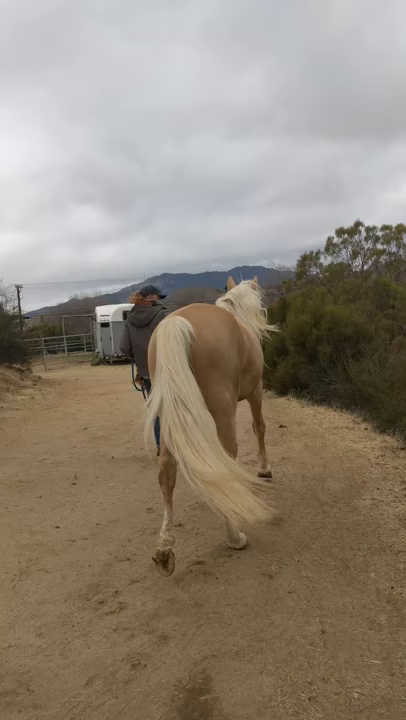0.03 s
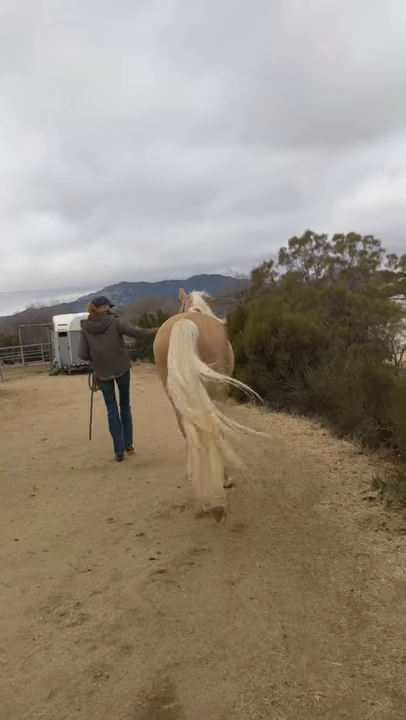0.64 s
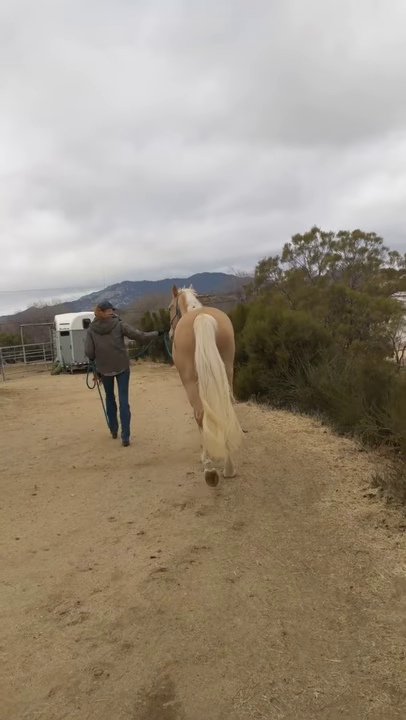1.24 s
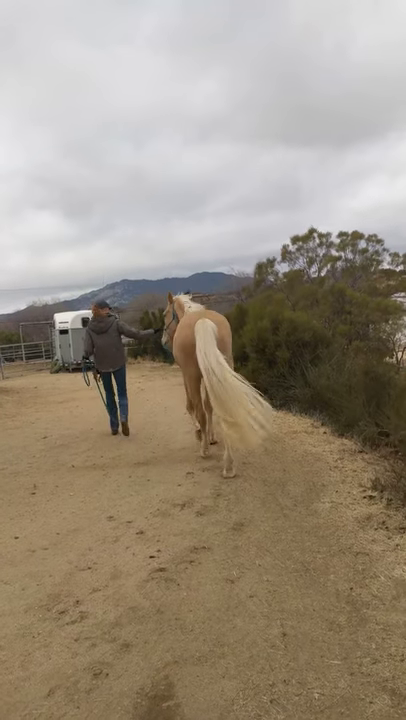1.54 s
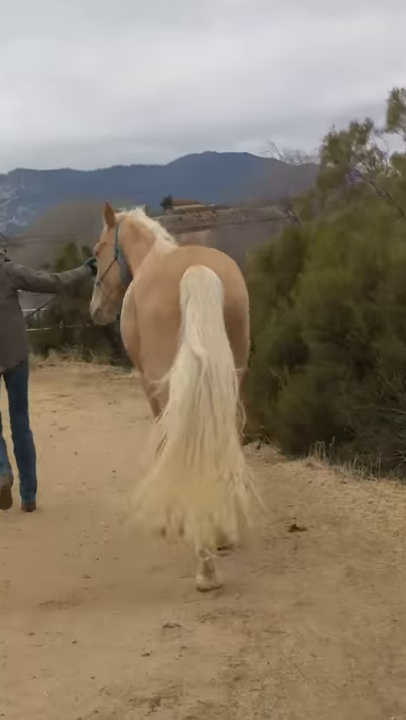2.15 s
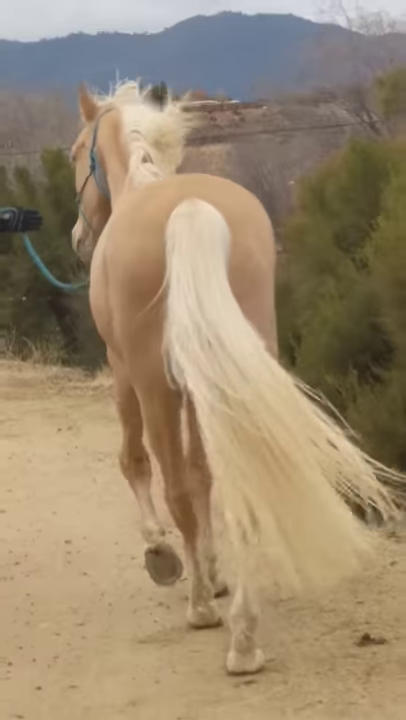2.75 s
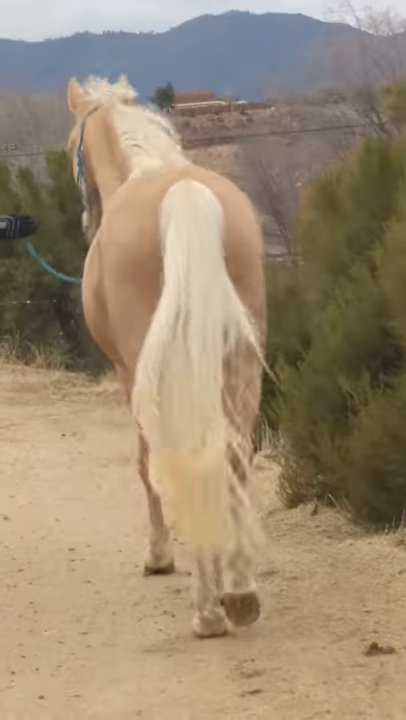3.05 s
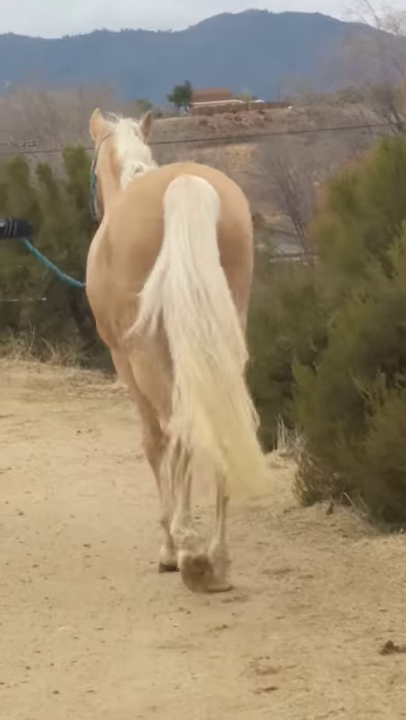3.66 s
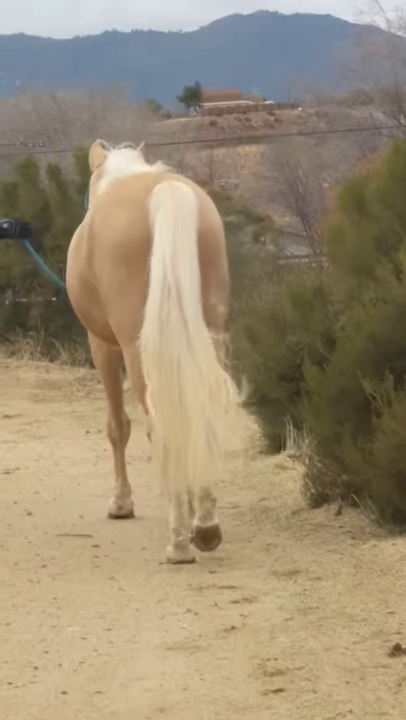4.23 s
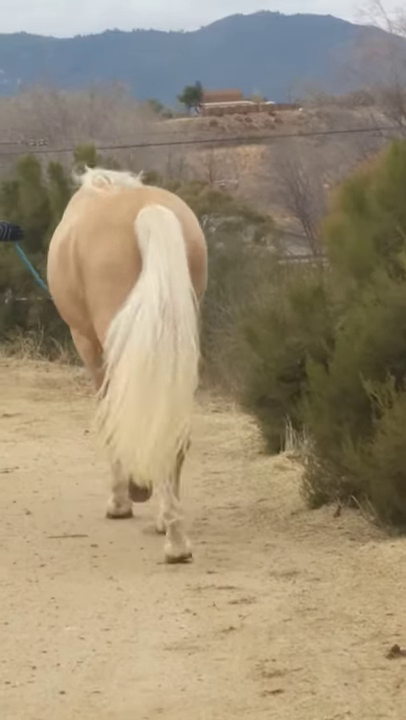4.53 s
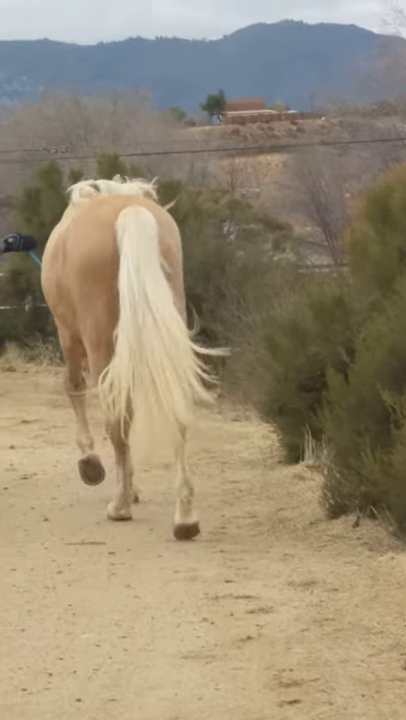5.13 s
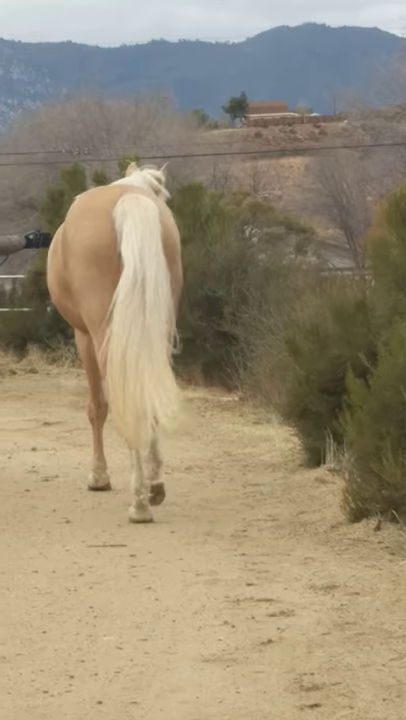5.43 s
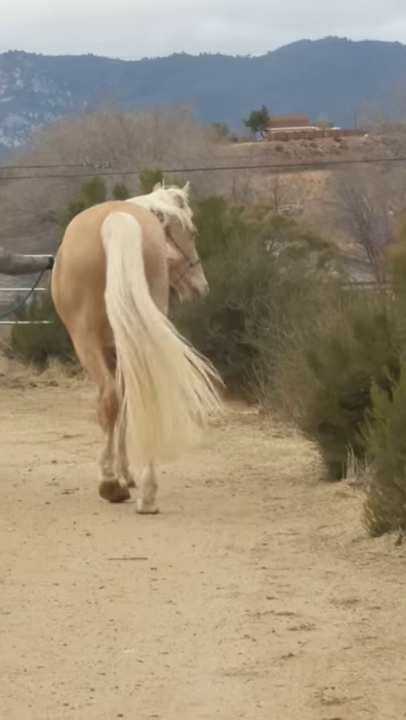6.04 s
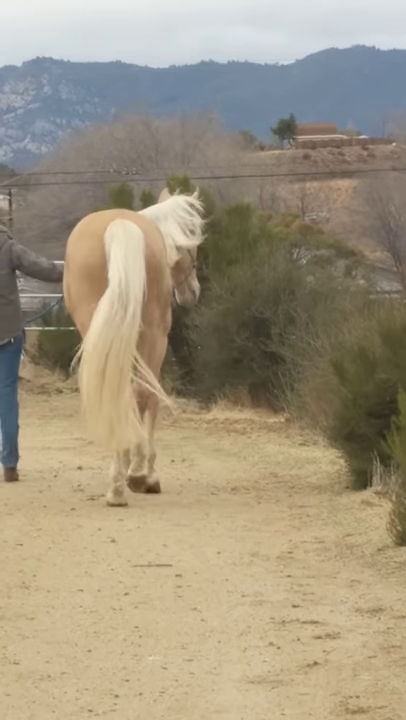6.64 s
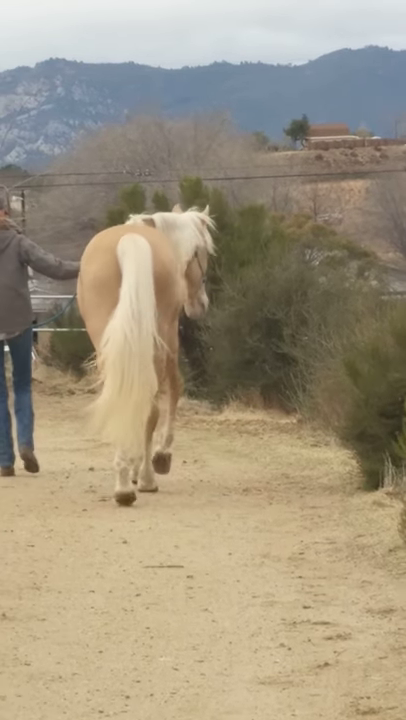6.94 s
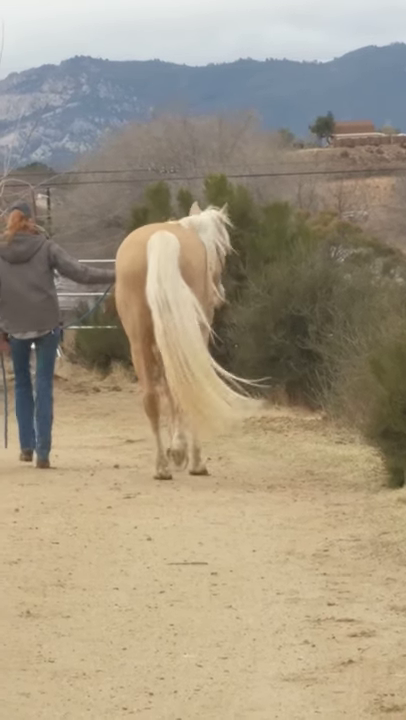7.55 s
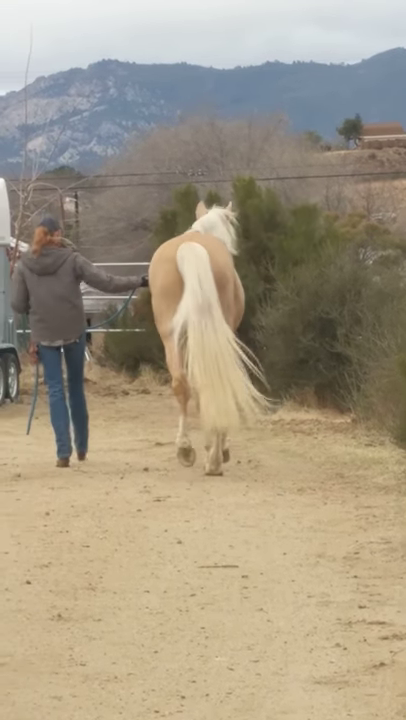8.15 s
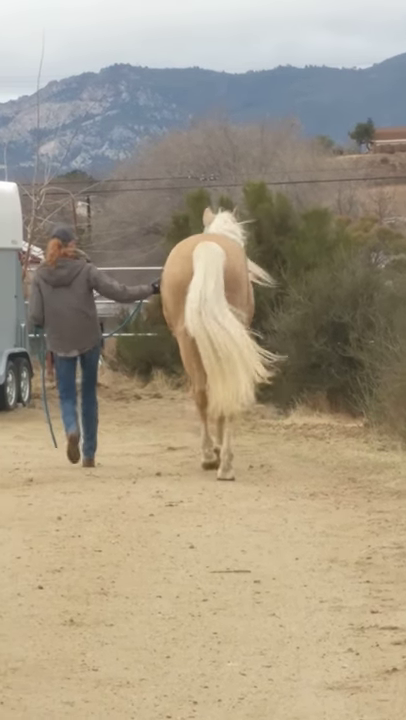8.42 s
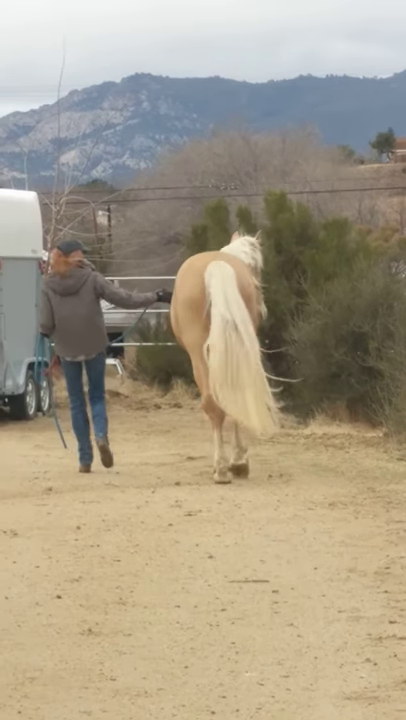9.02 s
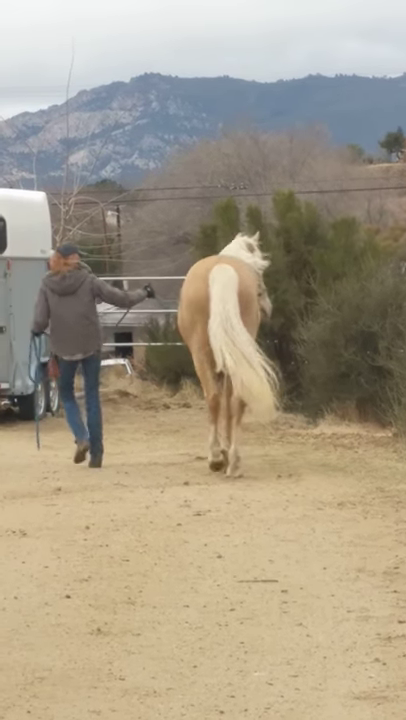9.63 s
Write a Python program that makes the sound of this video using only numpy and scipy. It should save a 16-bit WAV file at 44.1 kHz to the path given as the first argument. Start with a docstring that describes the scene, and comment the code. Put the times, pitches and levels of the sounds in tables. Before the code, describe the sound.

Gusty wind rumbles and thumps on the microphone over faint scuffs of a horse's hooves on a dirt track.

```python
"""A horse is led away down a dirt track in gusty wind. The single microphone opens at 0.1 s; a soft
outdoor hiss and a faint, high whine fade in. By 0.5 s wind buffets it: a low rumble that brightens
with the gusts, and separate eddies that thump. Hooves scuff the grit and flick small stones throughout.
Near 3.8 s a faint, distant call sinks in pitch. From 7 s the wind eases, and between 7.3 and 8.5 s
hooves knock on hard ground."""
import sys
import numpy as np
from scipy import signal
from scipy.fft import rfft, irfft, next_fast_len
from scipy.io import wavfile
from scipy.ndimage import uniform_filter1d, map_coordinates

SR = 44100
rng = np.random.default_rng(int(sys.argv[2]) if len(sys.argv) > 2 else 0)


def wav_record(signal):
    """Record a signal, one row per channel, as 16-bit PCM in the file named by sys.argv[1]."""
    frames = np.transpose(np.atleast_2d(signal))
    bounded = np.clip(frames, -1, 1)
    # unit amplitude maps onto the largest positive 16-bit level
    quanta = np.round(bounded * 32767).astype(np.int16)
    wavfile.write(sys.argv[1], SR, quanta)


N = 435708
TIME_S = np.arange(N) / SR
OPEN_S, USUAL_WIND_DB = .112, -25

# wind at the microphone: time_s, strength_db
WIND_STRENGTH = [(.12, -36), (.3, -29), (.45, -23), (1.6, -26.5), (2.3, -24), (2.6, -23), (3.1, -22.5),
                 (3.7, -27.5), (4.4, -25.5), (5.1, -26.5), (5.6, -27.5), (6.2, -27.5), (6.6, -26),
                 (7.3, -29.5), (8.3, -32), (9.2, -32), (9.88, -32.5)]


def wind():
    """Gusts, surges and puffs hit the port: slow air throbs, faster air adds rumble, buffet, flutter."""
    # gusts at the port: centre_s, half_length_s, strength_db
    gusts = [(.52, 0.11, 5.5), (.635, 0.012, 3), (.76, 0.033, 2.5), (1.01, 0.033, 6.5), (1.328, 0.051, 6.5),
             (1.445, 0.045, 4.5), (1.62, 0.14, 4.5), (1.78, 0.039, 7), (2.38, 0.056, 4.5),
             (3.265, 0.021, 6.5), (3.38, 0.079, 6), (4.768, 0.015, 4), (4.968, 0.012, 8),
             (5.17, 0.038, 4.5), (6.58, 0.05, 4), (6.715, 0.027, 6), (7.797, 0.018, 6), (8.71, 0.026, 8.5),
             (9.39, 0.0098, 8.5)]
    # broad pushes of air that swell the rumble: centre_s, half_length_s, rise_db
    surges = [(1.57, 0.0093, 8.5), (2.07, 0.019, 7), (2.16, 0.029, -1.5), (2.47, 0.026, 6.5),
              (2.61, .02, 3), (2.82, 0.041, 3), (2.9, 0.014, 4), (3.53, 0.013, 8), (3.7, 0.017, 9),
              (3.94, 0.032, 6), (4.13, .02, 5), (4.28, 0.016, 6.5), (4.43, 0.018, 1.5), (4.73, 0.039, 4),
              (4.87, 0.014, 4.5), (5.16, 0.038, 3), (5.57, 0.014, 3), (5.64, 0.018, 4.5), (5.86, 0.043, 5),
              (6, 0.013, 6.5), (6.26, 0.026, 4.5), (6.37, 0.022, 9), (6.55, 0.036, 3), (6.73, 0.019, 6.5),
              (6.84, 0.018, 1.5), (6.92, 0.023, 7), (7.07, 0.013, 8.5), (7.15, 0.017, 8),
              (7.45, 0.023, 7.5), (7.54, 0.024, 8), (7.8, 0.032, 4), (8.15, 0.019, 1.5), (8.25, 0.014, 8),
              (8.35, 0.046, 6.5), (8.58, 0.018, 8.5), (8.73, 0.032, 9.5), (8.83, 0.035, 2),
              (8.95, 0.0084, 5.5), (9.15, .02, 4.5), (9.26, 0.019, 4.5), (9.39, 0.044, 6.5),
              (9.8, 0.02, 4.5)]
    # pressure spectra, low to high: freq_hz, density_db
    deep_spectrum = [(15, -51), (28, -31), (40, -15.5), (55, 0.5), (75, -4), (100, -15), (150, -35),
                     (300, -70.5)]
    rumble_spectrum = [(30, -45.5), (55, -15), (85, -1), (120, -2.5), (175, -14), (300, -39), (600, -78)]
    buffet_spectrum = [(50, -19.5), (110, 3), (170, 4), (250, -0.5), (330, -11.5), (450, -30), (700, -47.5),
                       (1500, -90)]
    flutter_spectrum = [(150, -22), (300, -0.5), (420, 5.5), (620, -5), (850, -13.5), (1200, -28.5),
                        (2500, -63.5)]
    # strongest eddies: centre_s, peak_db, centre_hz
    strong_eddies = [(0.153, -31, 147), (0.237, -29, 100), (0.269, -27.5, 115), (0.291, -28, 131),
                     (0.468, -13, 146), (0.493, -11.5, 191), (0.51, -16, 229), (0.523, -19, 176),
                     (0.547, -13, 169), (0.559, -14, 207), (0.618, -15, 180), (0.637, -14.5, 142),
                     (0.653, -13.5, 161), (0.671, -23, 106), (0.698, -20, 160), (0.756, -23.5, 120),
                     (0.986, -13.5, 125), (1.006, -19.5, 134), (1.035, -13.5, 105), (1.299, -18, 171),
                     (1.309, -15, 139), (1.325, -30, 94.5), (1.351, -13, 176), (1.362, -9, 106),
                     (1.43, -21, 190), (1.442, -17.5, 126), (1.462, -15, 195), (1.572, -18.5, 155),
                     (1.635, -16, 154), (1.654, -26, 207), (1.667, -17, 131), (1.753, -16.5, 142),
                     (1.769, -13, 211), (1.803, -16, 199), (1.818, -26.5, 182), (1.833, -20, 126),
                     (1.96, -20, 131), (2.117, -19.5, 125), (2.158, -15.5, 90), (2.194, -28, 190),
                     (2.252, -16.5, 119), (2.343, -32, 200), (2.364, -15, 266), (2.392, -15, 85.5),
                     (2.711, -16, 95), (2.785, -26, 153), (2.874, -16, 201), (2.948, -18.5, 125),
                     (3.031, -17, 138), (3.093, -21.5, 116), (3.115, -20, 139), (3.179, -20.5, 130),
                     (3.275, -11.5, 148), (3.348, -15.5, 124), (3.373, -19, 410), (3.394, -13.5, 110),
                     (3.41, -15, 125), (3.44, -16, 150), (3.689, -14.5, 160), (4.156, -25.5, 121),
                     (4.277, -18, 83), (4.322, -23, 155), (4.439, -18.5, 64.4), (4.553, -22.0, 172),
                     (4.757, -18, 118), (4.771, -11.5, 144), (4.884, -13.5, 127), (4.968, -16, 100),
                     (5.041, -25, 113), (5.15, -11.5, 96), (5.18, -18, 116), (5.625, -23.5, 109),
                     (6.355, -24.5, 131), (6.559, -19.5, 166), (6.603, -17, 112), (6.707, -20.5, 137),
                     (6.833, -23.5, 96), (7.052, -24, 76), (7.091, -33, 94), (7.441, -29, 77.4),
                     (7.534, -20, 98), (7.793, -15.5, 104), (7.924, -31, 140), (8.15, -16, 68.6),
                     (8.555, -22, 58.7), (8.702, -17.5, 137), (8.822, -31.5, 119), (8.947, -30, 84),
                     (9.143, -34, 110), (9.39, -15, 77)]
    wake_half_s, wake_db, puff_db = 0.0058, 2.5, 2.8
    gust, surge_db = swells(gusts), swells(surges)
    wake = swells([(s, wake_half_s, wake_db) for s, _, _ in strong_eddies])  # swirl round each eddy
    eased_db = USUAL_WIND_DB - curves(WIND_STRENGTH)[0]
    unrest = (1 + 0.044 * eased_db) / (1 + 0.27 * gust + 0.69 * wake)  # strong flow is steadier
    puffs = puff_db * puff_train(rate_hz=14, scatter=.45) + wobble(rate_hz=10)
    flow_db = strength_db() + wake + unrest * puffs
    flicker = np.tanh(1.3 * wobble(rate_hz=60)) / (1 + .08 * gust)

    def gain(base_db, per_flow, per_gust):
        return amp(base_db + per_flow * flow_db + per_gust * gust)

    deep = gain(-29.5, per_flow=0.73, per_gust=0.31) * turbulence(deep_spectrum, span_s=0.039)
    rumble = gain(-30, per_flow=1.41, per_gust=0.52) * turbulence(rumble_spectrum, span_s=0.054)
    buffet = gain(-43, per_flow=1.63, per_gust=2.44) * turbulence(buffet_spectrum, span_s=0.017)
    buffet *= amp(6 * flicker)
    flutter = gain(-64.5, per_flow=2.7, per_gust=2.5) * amp(9.1 * flicker + 3.1 * wobble(rate_hz=130))
    flutter *= turbulence(flutter_spectrum, span_s=0.0069)
    low = amp(surge_db) * (deep + rumble)
    bright = amp(0.12 * surge_db) * (buffet + flutter)
    return low + bright + eddies([*strong_eddies, *small_eddies(rate_hz=16)])


def strength_db():
    """Wind strength over the usual: a slow drift, broken by lulls."""
    # lulls between gusts: centre_s, half_length_s, drop_db
    lulls = [(.2, 0.016, 20), (.32, 0.018, 19), (.9, 0.036, 10.5), (1.17, 0.054, 13), (1.4, 0.0055, 4.5),
             (1.9, 0.048, 2.5), (2.55, 0.017, 1.5), (2.72, 0.042, 6.5), (3.06, .015, 5), (3.59, 0.036, 3.5),
             (4.19, 0.016, 7.5), (4.66, 0.0085, 2), (5.34, 0.021, 9.5), (5.46, 0.042, 20.5),
             (5.75, 0.054, 3), (6.78, 0.018, 10), (6.07, 0.0099, 5.5), (7.02, 0.018, 9), (7.23, 0.015, 11),
             (7.7, 0.04, 5.5), (7.89, 0.043, 8), (8.02, 0.035, 5.5), (8.49, 0.037, 2.5), (9.04, 0.03, 13.5),
             (9.46, 0.011, 10)]
    return curves(WIND_STRENGTH)[0] - USUAL_WIND_DB - swells(lulls)


def puff_train(rate_hz, scatter):
    """Rounded puffs at an uneven pace: 1 at a crest, -2 in a gap."""
    cycles = np.cumsum(rate_hz * np.exp(scatter * wobble(rate_hz=14))) / SR
    return 3 * np.abs(np.sin(np.pi * cycles)) - 2


def turbulence(spectrum, span_s):
    """Pressure noise held even over span_s, so that the gusts set its level."""
    noise = coloured(rng.standard_normal(N), spectrum)
    width = max(int(span_s * SR), 2)
    power = uniform_filter1d(uniform_filter1d(noise ** 2, width), width)
    return unit(noise / np.sqrt(np.abs(power) + 0.024))


def eddies(rows, skew_rad=0.65, port_hz=70, port_q=1.82):
    """Each eddy is one lopsided pressure swing, duller if wider; the port cuts deep bass and rings."""
    out, size = np.zeros(N), 4096
    f = np.fft.rfftfreq(size, 1 / SR)
    for centre_s, peak_db, centre_hz in rows:
        skew = np.exp(1j * skew_rad * rng.uniform(-0.86, 1))
        spectrum = 1j * f * skew * np.exp(-(f / centre_hz) ** 1.3 / 1.3)
        swing = np.fft.fftshift(irfft(spectrum))
        add(out, centre_s - size / 2 / SR, at_peak(swing, peak_db))
    return filtered(out, lambda hz: -hz ** 2 / (port_hz ** 2 - hz ** 2 + 1j * hz * port_hz / port_q))


def small_eddies(rate_hz, count=400):
    """Lesser eddies at random moments, sized by the wind: centre_s, peak_db, centre_hz."""
    centre_s = OPEN_S + np.cumsum(rng.exponential(size=count)) / rate_hz
    size, pitch = rng.standard_normal((2, count))
    peak_db = -34 + 3 * np.interp(centre_s, TIME_S, strength_db()) + 4 * np.clip(size, -2, 1.5)
    centre_hz = 110 * np.exp(0.066 * np.clip(pitch, -2, 2))
    return np.transpose([centre_s, peak_db, centre_hz])[centre_s < N / SR]


def scuffs():
    """A foot grinds the dirt: a swell of grains, duller in soft soil, with a spray of fine sand."""
    # hooves and boots: centre_s, soil_db, half_length_s, soil_hz, sand_db
    steps = [(0.406, -69, .035, 2330, -72.5), (0.532, -78.5, 0.012, 3000, -72),
             (0.95, -60.5, 0.03, 1690, -73.5), (1.254, -60.5, 0.029, 1800, -73),
             (1.673, -71.5, 0.008, 4980, -73), (2.138, -64.5, 0.012, 3290, -90),
             (2.774, -75.5, 0.049, 3530, -79), (2.893, -69.5, 0.011, 3480, -79.5),
             (3.167, -71.5, 0.024, 3720, -73.5), (3.815, -63, 0.037, 1930, -91),
             (4.084, -64.5, 0.014, 2400, -70.5), (4.211, -76, 0.027, 3500, -74.5),
             (4.266, -62, 0.0034, 1980, -75), (4.477, -62.5, 0.0091, 1890, -81),
             (4.642, -56, .012, 1850, -75), (4.949, -60, 0.0041, 1910, -71),
             (5.205, -57, 0.0053, 2400, -65), (5.55, -55.5, 0.032, 1110, -72.5),
             (5.664, -61, 0.0048, 2400, -77.5), (5.809, -50.5, 0.015, 1500, -66.5),
             (6.11, -54.5, 0.0079, 1770, -75), (6.235, -65, 0.023, 2000, -74),
             (6.371, -58.5, 0.012, 1980, -74), (6.866, -62.5, 0.013, 2980, -74.5),
             (7.0, -53.5, .012, 1700, -67), (7.347, -52.5, 0.025, 820, -71),
             (7.454, -60.5, 0.014, 2760, -74.5), (7.589, -64, 0.0051, 2600, -75),
             (7.7, -64, .004, 3500, -66.5), (7.773, -56, 0.036, 2100, -70.5),
             (7.962, -64, 0.076, 3580, -76), (8.179, -53, 0.0049, 1770, -78.5),
             (8.433, -75, 0.16, 4470, -79.5), (8.693, -61, 0.017, 1770, -68.5),
             (8.912, -61.5, 0.04, 4660, -73), (8.936, -55.5, 0.031, 1790, -78.5),
             (9.195, -76, .07, 3360, -81.5), (9.333, -69, 0.024, 2360, -71)]
    out, t = np.zeros(N), np.arange(-SR // 4, SR // 4) / SR
    for centre_s, soil_db, half_s, soil_hz, sand_db in steps:
        soil = unit(band(crunch(len(t), rate_hz=2600, spread_db=3), soil_hz, q=0.94))
        sand = unit(band(crunch(len(t), rate_hz=1800, spread_db=3), centre_hz=7000, q=0.36))
        swell = np.exp(-np.abs(t / half_s) ** 1.3 / 2)
        add(out, centre_s + t[0], swell * (amp(soil_db) * soil + amp(sand_db) * sand))
    return out


def crunch(samples, rate_hz, spread_db):
    """Sand grains breaking at random, most of them small."""
    breaks = rng.random(samples) < rate_hz / SR
    kick = rng.standard_normal(samples)
    size_db = spread_db * np.minimum(rng.exponential(size=samples), 4)
    return unit(breaks * kick * amp(size_db))


def stones(crumble_db=-20.5, crumble_t60_s=0.016):
    """Pebbles click or clink: one sharp contact, then a few milliseconds of crumbling."""
    # loudest pebbles, and the high ring of the hoof strike at 7.334 s: start_s, peak_db, ring_hz, ring_q
    loud_stones = [(0.516, -46, 2680, 3.1), (0.52, -50.5, 2690, 4.5), (1.094, -48, 2380, 2.2),
                   (1.252, -42.5, 2380, 1.2), (1.644, -48.5, 9150, 0.93), (1.671, -49.5, 12250, 0.83),
                   (2.135, -47, 4100, 1.6), (2.138, -43.5, 3700, 2.1), (2.148, -47.5, 3970, 2),
                   (2.157, -44, 3540, 2.7), (3.2256, -45, 10500, 0.85), (4.0535, -50, 9100, 0.59),
                   (5.183, -49.5, 6650, 1), (5.204, -46, 2400, 1), (5.508, -43, 1800, 0.55),
                   (5.653, -50, 3600, 1.1), (5.8, -42, 1860, 1.9), (5.8027, -38.5, 1500, 2.3),
                   (5.8073, -41, 2200, .8), (5.8135, -56.5, 2600, 1.8), (5.923, -45, 3600, 1.2),
                   (6.109, -47, 2200, 1), (6.366, -54, 2800, 0.78), (6.995, -43, 2000, 1),
                   (7.334, -44, 3380, 2.5), (7.3452, -51, 3400, 0.73), (8.0142, -36.5, 1890, 0.97),
                   (8.077, -37.5, 1400, 1.1), (8.2542, -39.5, 1930, 1.3), (8.412, -58, 8400, 8),
                   (8.7054, -48, 6150, 1.4)]
    out, t = np.zeros(N), np.arange(SR // 20) / SR
    for start_s, peak_db, ring_hz, ring_q in [*loud_stones, *small_stones()]:
        contact = t == 0
        crumble = rng.standard_normal(len(t)) * amp(crumble_db - 60 * t / crumble_t60_s)
        click = band(contact + crumble, ring_hz, ring_q)
        add(out, start_s, at_peak(click, peak_db))
    return out


def small_stones(count=12):
    """Tiny pebbles flicked at random moments: start_s, peak_db, ring_hz, ring_q."""
    when, size, pitch = rng.random((count, 3)).T
    start_s = OPEN_S + when * (N / SR - OPEN_S)
    return np.transpose([start_s, -62 + 5 * size, 2400 * 3.6 ** pitch, np.ones(count)])


def knocks():
    """A hoof meets hard ground with a short, hollow ring."""
    # hoof strikes: start_s, peak_db, ring_hz, t60_s
    strikes = [(7.3335, -39.5, 804, 0.012), (7.345, -50, 890, 0.036), (7.3895, -37, 477, 0.018),
               (8.4555, -36.5, 485, 0.0083)]
    out, t = np.zeros(N), np.arange(SR // 10) / SR
    for start_s, peak_db, ring_hz, t60_s in strikes:
        attack = 1 - np.exp(-t * ring_hz)
        ring = np.sin(2 * np.pi * ring_hz * t) * amp(-60 * t / t60_s)
        add(out, start_s, at_peak(attack * ring, peak_db))
    return out


def distant_call():
    """A faint, slightly raspy call that sinks in pitch."""
    # course of the call: time_s, pitch_hz, level_db
    contour = [(3.73, 2520, -90), (3.765, 2430, -63), (3.79, 2150, -65), (3.83, 2050, -66),
               (3.87, 2000, -61), (3.92, 1880, -65), (3.97, 1850, -90)]
    pitch_hz, level_db = curves(contour)
    raspy_tone = tone(pitch_hz + 110 * wobble(rate_hz=400))
    return amp(level_db + 3.2 * wobble(rate_hz=62)) * raspy_tone


def outdoors(fade_s=0.35, fade_db=30.5, whine_hz=11635):
    """Air moving through the brush, fine grit crackling underfoot, and a thin wavering whine."""
    # base level of all three: time_s, level_db
    hiss_levels = [(0.3, -60), (0.43, -63), (0.91, -66.5), (1.07, -61.5), (1.39, -67.5), (2.11, -62),
                   (2.41, -67), (2.81, -63), (3.47, -67), (3.82, -62), (4.49, -65), (4.97, -67),
                   (5.28, -66.5), (5.42, -61.5), (5.71, -63), (6.22, -60.5), (6.63, -66), (7.3, -62),
                   (7.6, -64), (7.9, -57), (8.17, -60), (8.76, -62), (9.32, -61), (9.42, -66.5),
                   (9.58, -62), (9.88, -60.5)]
    # spectra of air and grit: freq_hz, density_db
    air_spectrum = [(100, 5), (400, 1.5), (750, 2), (1100, 0), (1600, -5.5), (2100, -10), (3100, -18.5),
                    (4400, -23), (5500, -23), (6800, -25.5), (10000, -32), (17000, -33)]
    grit_spectrum = [(600, -4.5), (1500, 16.5), (3000, 10.5), (5500, 1), (7000, -8), (10000, -1.5),
                     (13000, -7), (17000, -9)]
    fade_in_db = -fade_db * np.clip(1 - TIME_S / fade_s, 0, 1)
    base_db = curves(hiss_levels)[0] + fade_in_db + .6 * wobble(rate_hz=9)
    air_db = base_db + 6 + 1.1 * wobble(rate_hz=25)
    air = coloured(rng.standard_normal(N), air_spectrum)
    grit_db = base_db - 6.5 + 1.8 * wobble(rate_hz=45)
    grit = coloured(crunch(N, rate_hz=5000, spread_db=0.5), grit_spectrum)
    whine = tone(whine_hz + 11 * wobble(rate_hz=3))
    whine_db = base_db - 26.5 + wobble(rate_hz=20)
    return amp(air_db) * air + amp(grit_db) * grit + amp(whine_db) * whine


def amp(db):
    """Decibels to gain."""
    return 10 ** (np.asarray(db) / 20)


def unit(x):
    """x at rms 1."""
    return x / np.sqrt(np.mean(x ** 2) + 1e-20)


def at_peak(x, peak_db):
    """x scaled to a peak level."""
    return amp(peak_db) * x / np.abs(x).max()


def tone(pitch_hz):
    """A sine that follows a pitch curve."""
    return np.sin(2 * np.pi * np.cumsum(pitch_hz) / SR)


def curves(rows):
    """One value per sample for each column after the time."""
    time_s, *columns = np.transpose(rows)
    return [np.interp(TIME_S, time_s, column) for column in columns]


def swells(rows):
    """Sum of round-topped swells: centre_s, half_length_s, height."""
    return sum(height * np.exp(-np.abs((TIME_S - s) / half_s) ** 3 / 2) for s, half_s, height in rows)


def wobble(rate_hz):
    """A smooth random curve, rate_hz knots a second."""
    return map_coordinates(rng.standard_normal(N // 20), [TIME_S * rate_hz], mode="wrap")


def filtered(x, response):
    """x through a frequency response."""
    size = next_fast_len(len(x) + 8192)
    return irfft(rfft(x, size) * response(np.fft.rfftfreq(size, 1 / SR)), size)[:len(x)]


def coloured(x, spectrum):
    """x shaped by a spectrum (freq_hz, density_db), at rms 1."""
    freq_hz, db = np.transpose(spectrum)
    return unit(filtered(x, lambda hz: amp(np.interp(np.log(hz + 1), np.log(freq_hz), db, right=-120))))


def resonance(hz, centre_hz, q):
    """Response of a causal band-pass."""
    return 1j * hz * centre_hz / q / (centre_hz ** 2 - hz ** 2 + 1j * hz * centre_hz / q)


def band(x, centre_hz, q):
    """x through two equal band-passes."""
    return filtered(x, lambda hz: resonance(hz, centre_hz, q) ** 2)


def add(track, start_s, sound):
    """Mix a sound into the track from start_s on."""
    i = round(start_s * SR)
    part = sound[max(-i, 0):N - i]
    track[max(i, 0):][:len(part)] += part


def scene():
    """Wind on the port over the quiet sounds of the track."""
    return (wind() + scuffs() + stones() + knocks() + distant_call() + outdoors())[None]


def record(dry, low_cut_hz=34, top_hz=17000, ceiling=.48):
    """The microphone opens, sheds the deepest bass, rings in its port and rounds the largest swings."""
    opened = np.clip((TIME_S - OPEN_S) / 0.0033, 0, 1)
    x = signal.sosfilt(signal.butter(3, low_cut_hz, "high", fs=SR, output="sos"), dry[0] * opened)
    x = filtered(x, lambda hz: 1 + .7 * resonance(hz, centre_hz=5000, q=12))
    x = x / (1 + (x / ceiling) ** 6) ** (1 / 6)
    return filtered(x, lambda hz: hz < top_hz)[None]


dry = scene()
out = record(dry)
wav_record(out)
```